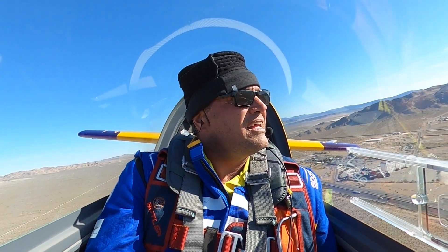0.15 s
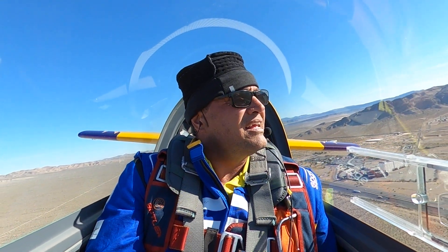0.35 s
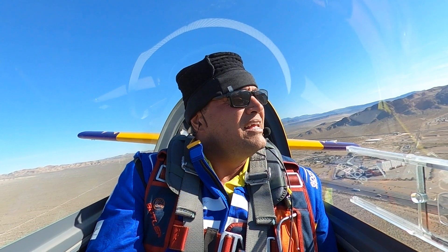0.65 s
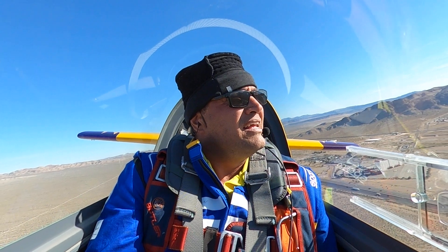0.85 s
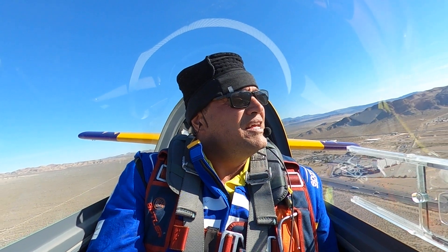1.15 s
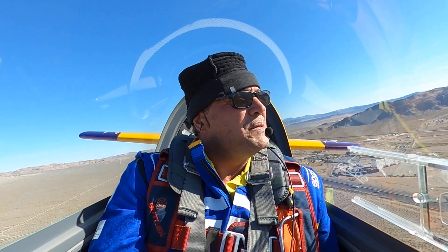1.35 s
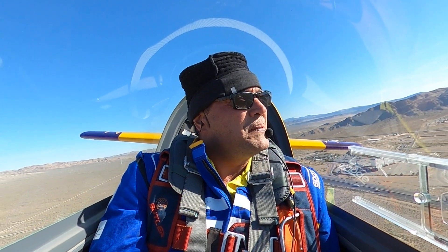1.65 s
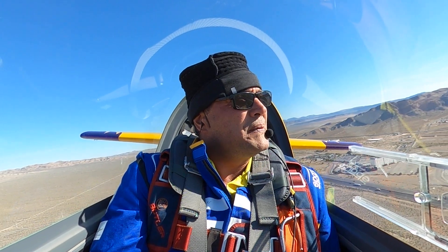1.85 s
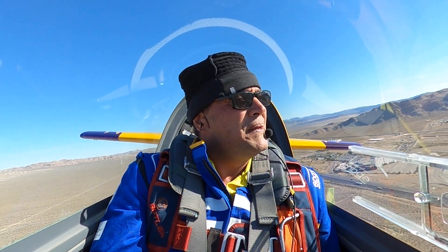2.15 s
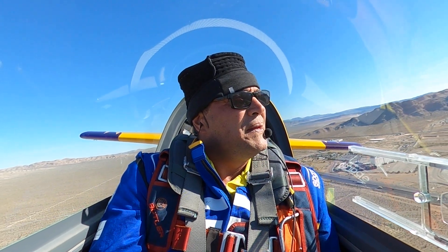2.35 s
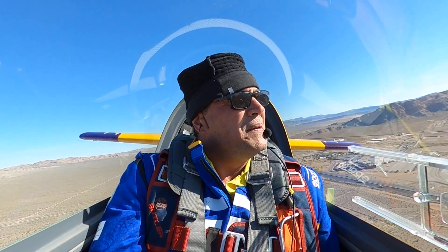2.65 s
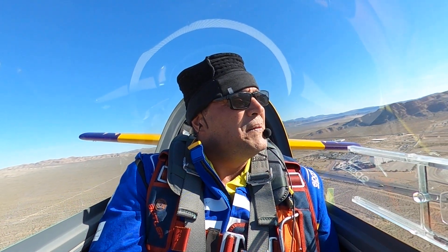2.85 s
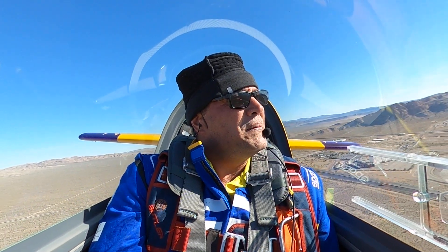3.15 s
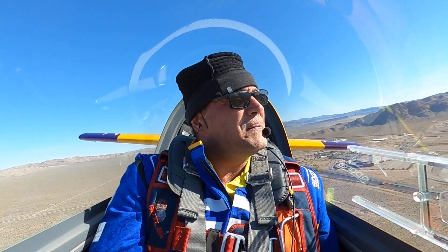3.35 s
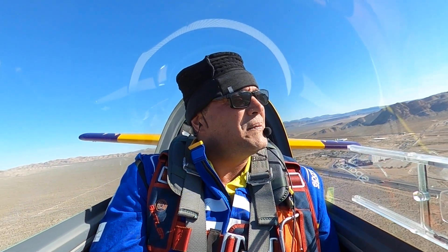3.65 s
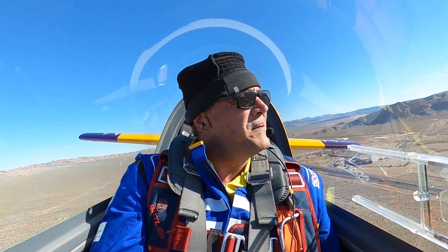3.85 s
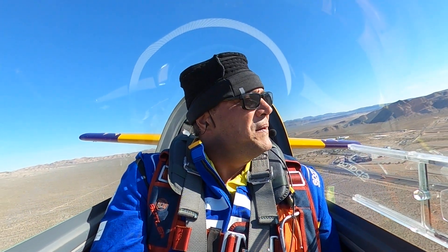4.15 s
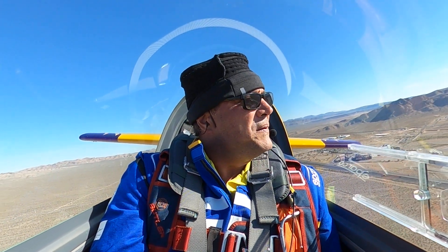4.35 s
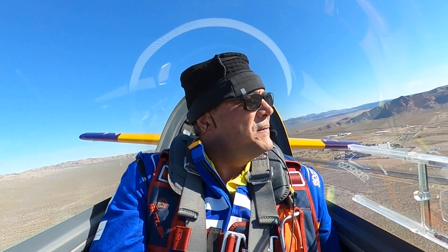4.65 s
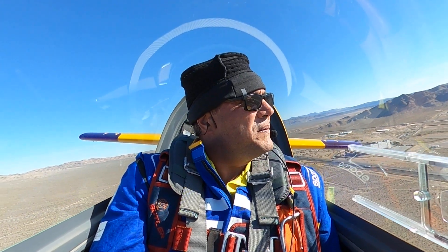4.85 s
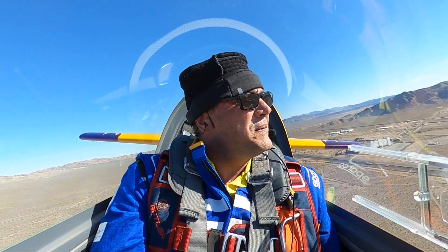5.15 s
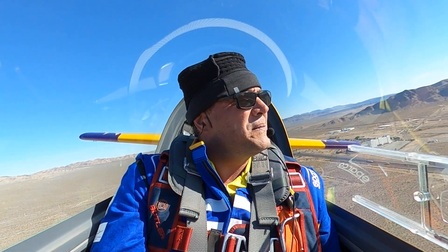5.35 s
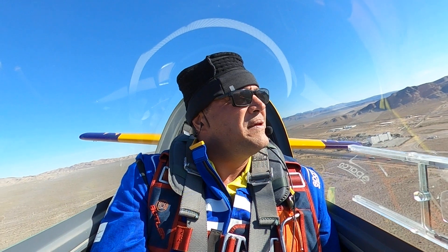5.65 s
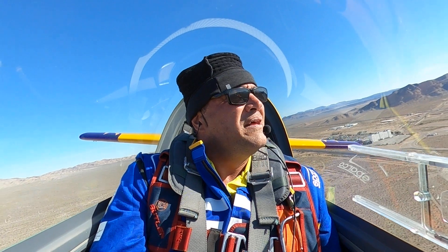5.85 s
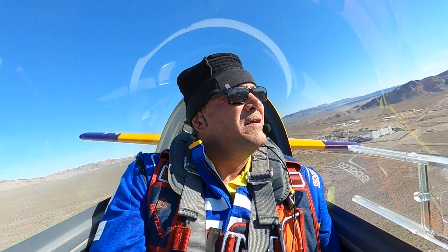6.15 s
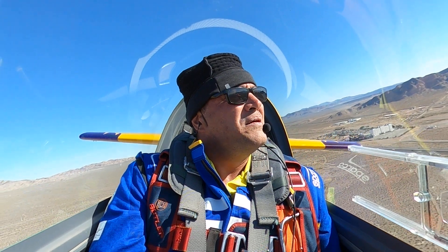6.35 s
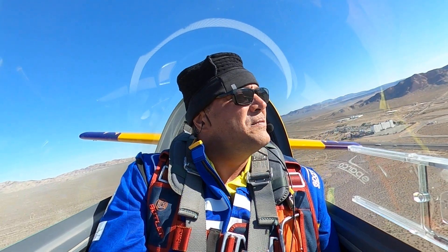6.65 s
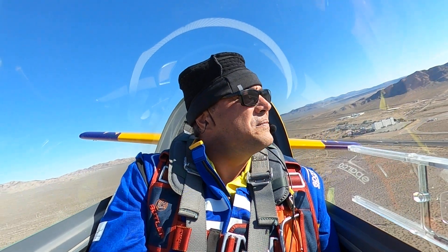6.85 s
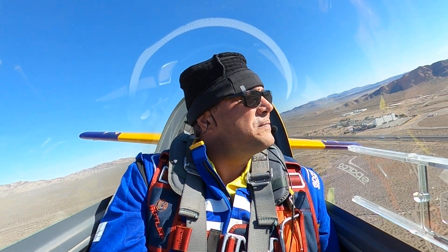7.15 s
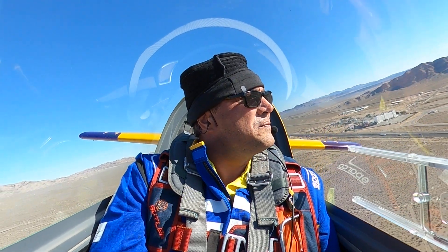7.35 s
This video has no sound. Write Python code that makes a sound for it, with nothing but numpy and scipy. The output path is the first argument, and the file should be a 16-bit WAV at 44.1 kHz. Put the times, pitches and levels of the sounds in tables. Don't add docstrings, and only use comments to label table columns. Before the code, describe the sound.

A piston aircraft engine and propeller drone loudly and steadily inside a small closed cockpit, with air rushing over the canopy.

```python
import sys
import numpy as np
from scipy import signal
from scipy.fft import rfft, irfft, next_fast_len
from scipy.io import wavfile
from scipy.ndimage import uniform_filter1d, minimum_filter1d, map_coordinates

SR = 44100
rng = np.random.default_rng(int(sys.argv[2]) if len(sys.argv) > 2 else 0)


def gain_from_decibels(decibels):
    exponent = np.asarray(decibels, float) / 20
    return 10 ** exponent


def store_wav(level_fs):
    pcm = np.round(np.clip(np.atleast_2d(level_fs), -1, 1) * 32767)
    wavfile.write(sys.argv[1], SR, pcm.T.astype(np.int16))


N = 330750


def unit(x):
    return x / np.sqrt(np.mean(x ** 2) + 1e-20)


def along(points, hz):
    point_hz, value = np.transpose(points)
    return np.interp(np.log(hz + 1), np.log(point_hz + 1), value)


def wobble(rate_hz):
    knots = rng.standard_normal(int(N * 40 / SR) + 4)
    return map_coordinates(knots, [np.arange(N) * min(rate_hz, 40) / SR])


def filtered(x, response):
    size = next_fast_len(N + 8192)
    return irfft(rfft(x, size) * response(np.fft.rfftfreq(size, 1 / SR)), size)[..., :N]


def crank():
    # time_s, firings_per_s
    firing_rate = [
        (0, 139.0),
        (1.2, 139.0),
        (1.6, 138.74),
        (3.3, 138.74),
        (3.8, 138.98),
        (4.6, 139.0),
        (5, 139.14),
        (7.5, 139.12),
    ]
    time_s, firings_per_s = np.transpose(firing_rate)
    cylinders = 6
    cycle_hz = np.interp(np.arange(N) / SR, time_s, firings_per_s) / cylinders
    return cycle_hz, .447 + 2 * np.pi * np.cumsum(cycle_hz) / SR


def tone_family(tones, lag_s, turn_rad, cycle_hz, cycle_rad):
    smear_rad, flutter_db = 0.025, 0.1237
    family = np.zeros(N)
    delayed_rad = cycle_rad - 2 * np.pi * cycle_hz * lag_s
    for multiple, level_db in tones:
        waver = np.sqrt(multiple)
        phase_rad = multiple * delayed_rad + turn_rad + smear_rad * waver * wobble(7.1)
        level = gain_from_decibels(level_db + flutter_db * waver * wobble(11))
        family += np.sqrt(2) * level * np.cos(phase_rad)
    return family


def engine(gain_db, cycle_hz, cycle_rad):
    # cycle_multiple, level_db (rms)
    firing_tones = [(6, -13.9), (12, -21.3), (18, -40.3), (30, -38.3), (42, -42.5), (54, -50)]
    # cycle_multiple, level_db (rms)
    shaft_tones = [(2, -35), (4, -28.8), (8, -47), (10, -31.7), (14, -29.2), (16, -39.5), (20, -38.6),
                   (22, -45.5), (34, -46)]
    # cycle_multiple, level_db (rms)
    bank_tones = [(9, -25.2), (13, -40), (15, -33.4), (23, -47), (31, -46), (33, -39), (35, -42),
                  (41, -39.5), (53, -48.5)]
    tone = tone_family(firing_tones, .00122, 1.06, cycle_hz, cycle_rad)
    tone += tone_family(shaft_tones, .00035, 1.6, cycle_hz, cycle_rad)
    tone += tone_family(bank_tones, .00165, 3.63, cycle_hz, cycle_rad)
    return gain_from_decibels(gain_db) * tone


def rattle(cycle_rad):
    level_db, scatter_db = -57, 2.5
    multiple = np.arange(5, 56)[:, None]
    draw = rng.standard_normal((len(multiple), 2))
    angle_rad = np.linspace(0, 2 * np.pi, 4097)
    level = gain_from_decibels(scatter_db * draw[:, :1])
    one_cycle = np.sum(level * np.cos(multiple * angle_rad + np.pi * draw[:, 1:]), axis=0)
    return np.sqrt(2) * gain_from_decibels(level_db) * np.interp(cycle_rad % (2 * np.pi), angle_rad, one_cycle)


def air(spectrum, patchy_db):
    # centre_hz, width_hz, lift_db
    cabin_modes = [(174, 27, -3), (283, 32, -3.5), (331, 6.5, 4), (402, 20, -1.5), (537, 24, -0.5),
                   (920, 33, -3), (1110, 78, -5), (481, 50, 9.5), (771.5, 112, 8.5), (975, 40, 4),
                   (1220, 59, 2.5), (1765, 160, 4.5), (1910, 58, 2.5), (2256, 70, 3.5), (2490, 46, 5.5),
                   (2890, 100, 3.5), (3085, 80, 7.5), (3420, 88, 6), (3596, 200, 5), (3950, 80, 0),
                   (5790, 100, 3.5)]

    def colour(hz):
        lift_db = sum(db / (1 + (2 * (hz - centre) / width) ** 2) for centre, width, db in cabin_modes)
        return gain_from_decibels(along(spectrum, hz) + lift_db)

    z = signal.stft(rng.standard_normal((2, N + 512)), nperseg=512)[2]
    patches = uniform_filter1d(rng.standard_normal(z.shape[1:]), size=6, axis=0)
    patches = uniform_filter1d(patches, size=14, axis=1)
    pair = signal.istft(z * gain_from_decibels(patchy_db * unit(patches)), nperseg=512)[1][:, :N]
    return unit(filtered(pair, colour))


def canopy_rush(speed, cycle_rad):
    # freq_hz, density_db_per_hz
    rush_spectrum = [(600, -120), (900, -26.5), (1100, 2.5), (2000, -3.5), (3300, -6), (4000, -4),
                     (5000, -8.5), (5850, -12.5), (6100, -16), (7900, -23), (8100, -27), (10200, -39),
                     (12400, -37.5), (15100, -54.5)]
    level_db = -27 + 2.1 * speed + 0.32 * wobble(5) + 0.18 * wobble(11)
    wash = 1 + .03 * np.cos(2 * cycle_rad)
    return gain_from_decibels(level_db) * air(rush_spectrum, patchy_db=0.3) * wash


def airframe_rumble(speed):
    # freq_hz, density_db_per_hz
    rumble_spectrum = [(8, -29), (25, -16.5), (50, -6.5), (85, 1.5), (120, -4), (270, -2.5), (340, -10),
                       (400, -15), (550, -17.5), (680, -10), (900, -13.5), (1050, -17), (1300, -48),
                       (2000, -120)]
    level_db = -22 + 1.5 * speed + 0.13 * wobble(2.1)
    return gain_from_decibels(level_db) * air(rumble_spectrum, patchy_db=-0.86)


def ports(near, apart):
    # freq_hz, likeness_0_to_1
    likeness = [(990, 1), (1200, 0.91), (1900, 0.62), (2500, 0.78), (5500, 0.84), (8000, .64), (12200, 0.4),
                (13200, .85)]
    # freq_hz, left_minus_right_db
    left_louder = [(1000, 3), (1400, 0), (1800, 4.5), (2200, 2.5), (4000, -.5), (9300, 0), (11000, 3.5),
                   (12800, 1.5)]
    # freq_hz, left_lead_rad
    left_lead = [(0, 0.074), (1030, 0.054), (1460, 1.66), (2150, 0.63), (2840, 0.77), (4200, 0.65),
                 (6030, 0.4), (8000, 0.04)]

    def alike(hz):
        return np.clip(along(likeness, hz), 0, 1)

    def half(hz):
        return gain_from_decibels(along(left_louder, hz) / 2) * np.exp(.5j * along(left_lead, hz))

    def shared(hz):
        return np.sqrt((1 + alike(hz)) / 2) * np.array([half(hz), 1 / half(hz)])

    def own(hz):
        return np.sqrt((1 - alike(hz)) / 2) * np.array([half(hz), -1 / half(hz)])

    return filtered(near, shared) + filtered(apart, own)


def scene():
    speed_builds_s = 6.4
    speed = np.minimum(np.arange(N) / SR / speed_builds_s, 1)
    cycle_hz, cycle_rad = crank()
    motor = engine(.5 - 0.94 * speed, cycle_hz, cycle_rad) + rattle(cycle_rad)
    wind = canopy_rush(speed, cycle_rad) + airframe_rumble(speed)
    return ports(motor + wind[0], wind[1])


def limited(x, top, hold_s):
    gain = np.minimum(1, top / (np.abs(x).max(axis=0) + 1e-9))
    span = int(hold_s * SR)
    return x * uniform_filter1d(minimum_filter1d(gain, size=2 * span + 1), size=span)


def low_pass(x):
    return signal.sosfilt(signal.butter(12, 15140, fs=SR, output="sos"), x)


def record(dry):
    top_hz = 15140
    held = limited(dry, top=.82, hold_s=.015)
    mix = filtered(held, lambda hz: hz < top_hz)
    return low_pass(mix)


dry = scene()
out = record(dry)
store_wav(out)
```